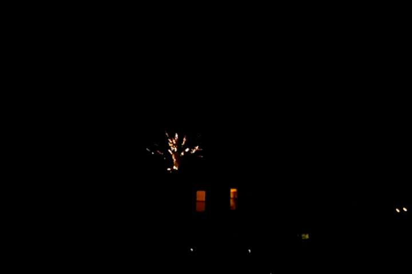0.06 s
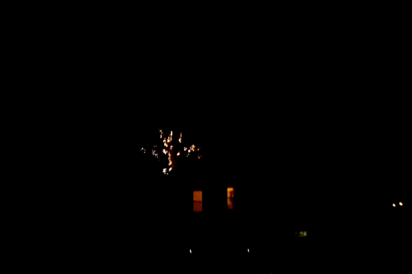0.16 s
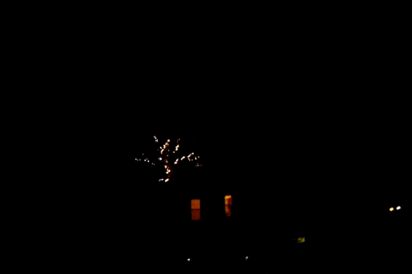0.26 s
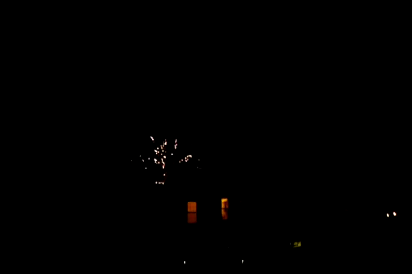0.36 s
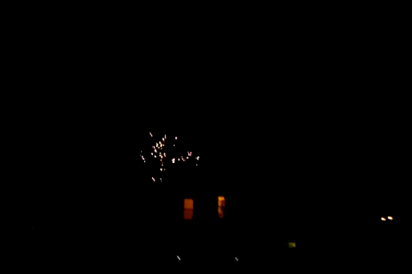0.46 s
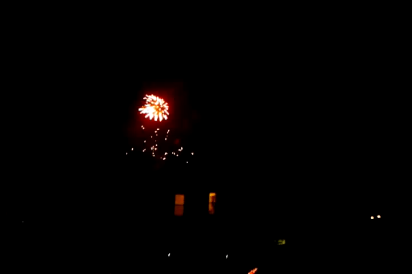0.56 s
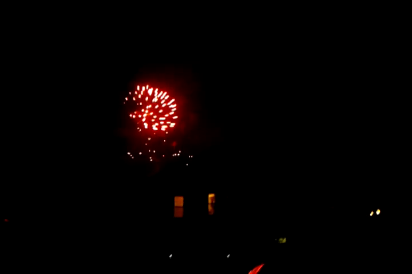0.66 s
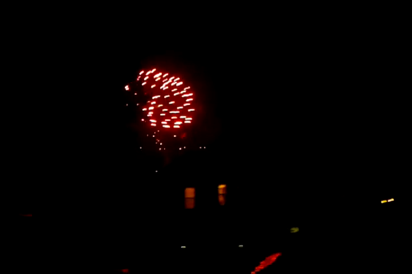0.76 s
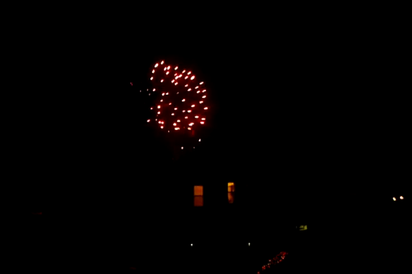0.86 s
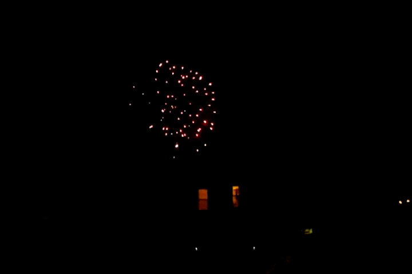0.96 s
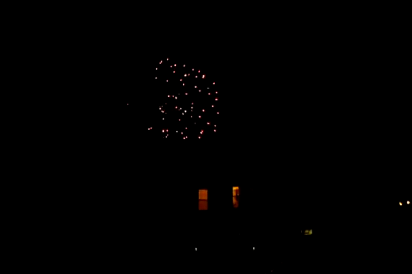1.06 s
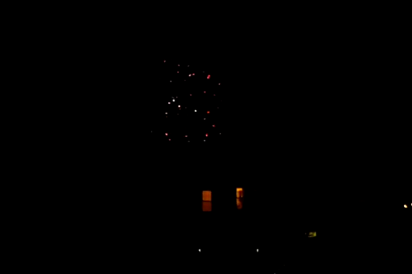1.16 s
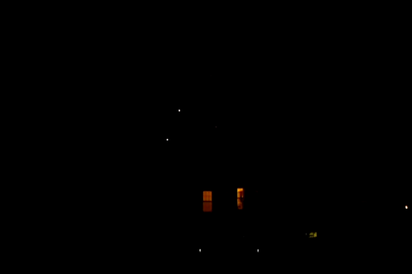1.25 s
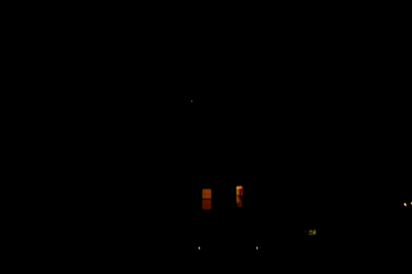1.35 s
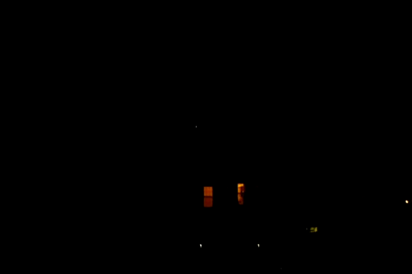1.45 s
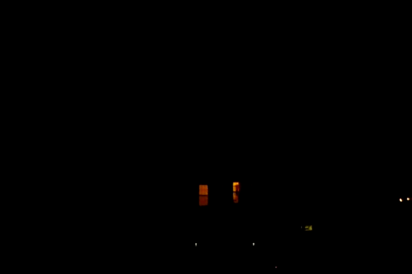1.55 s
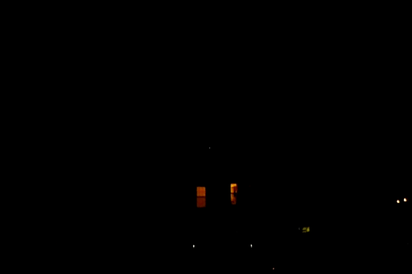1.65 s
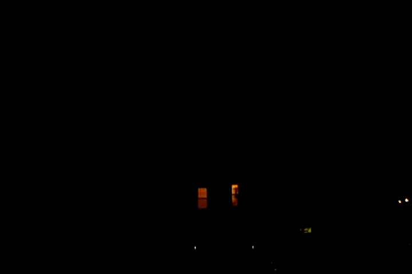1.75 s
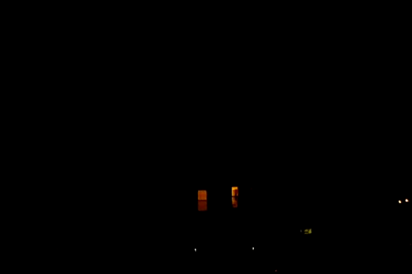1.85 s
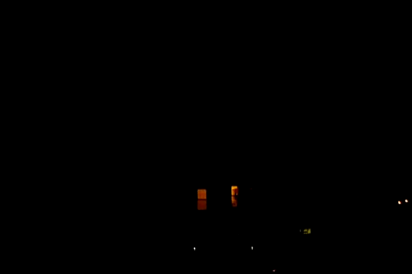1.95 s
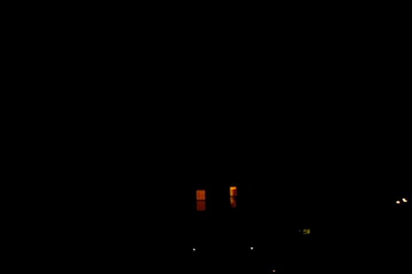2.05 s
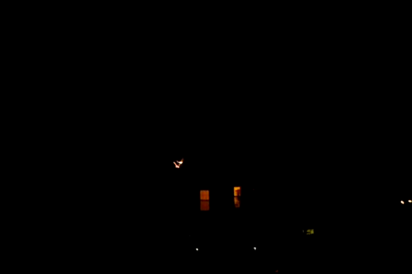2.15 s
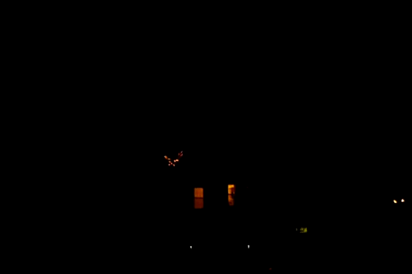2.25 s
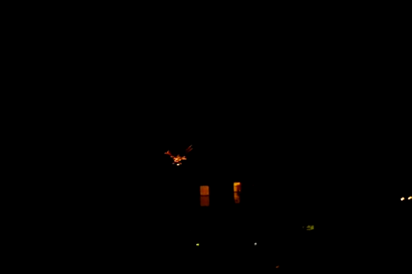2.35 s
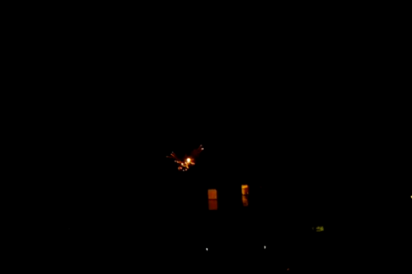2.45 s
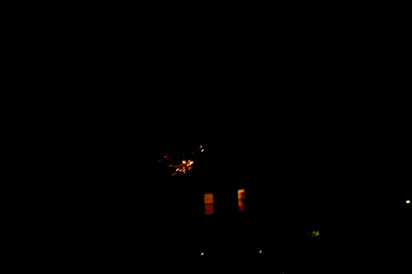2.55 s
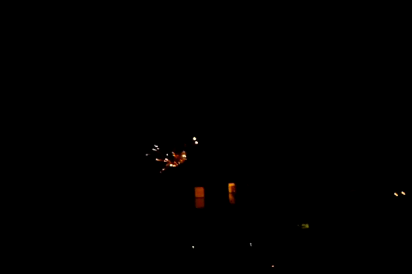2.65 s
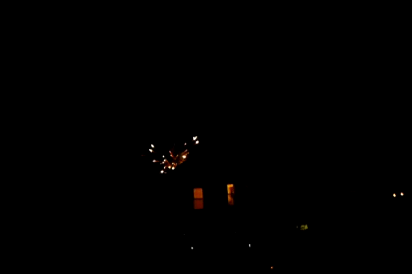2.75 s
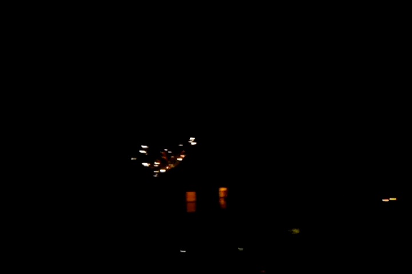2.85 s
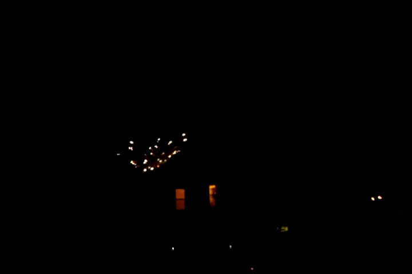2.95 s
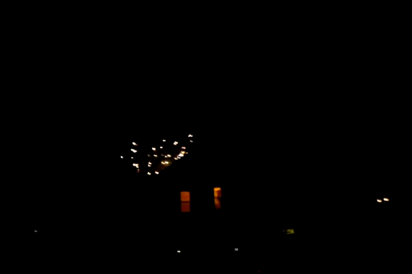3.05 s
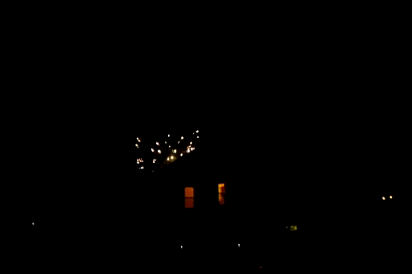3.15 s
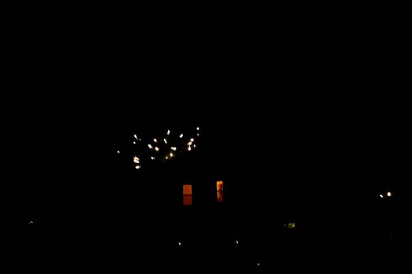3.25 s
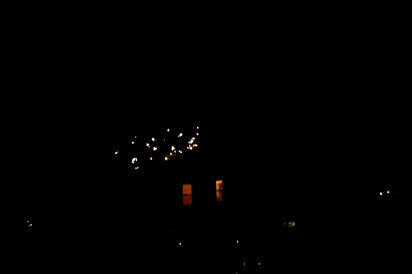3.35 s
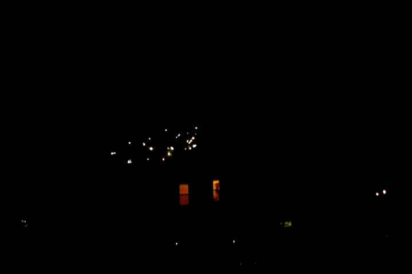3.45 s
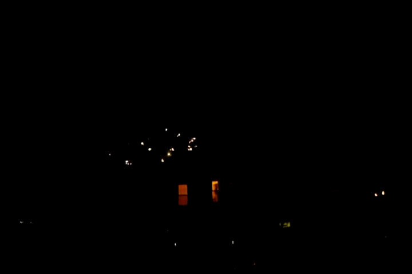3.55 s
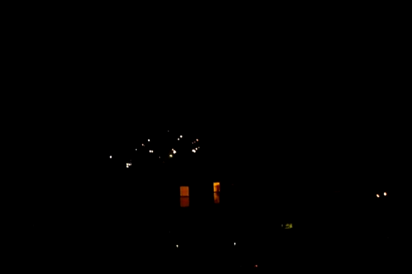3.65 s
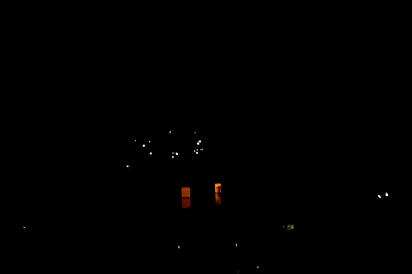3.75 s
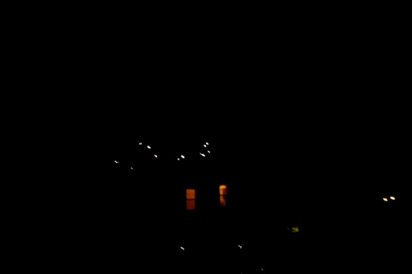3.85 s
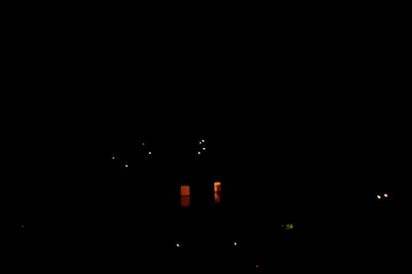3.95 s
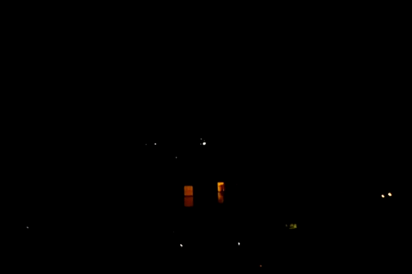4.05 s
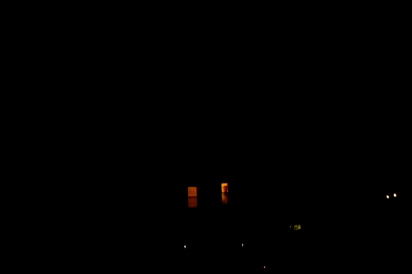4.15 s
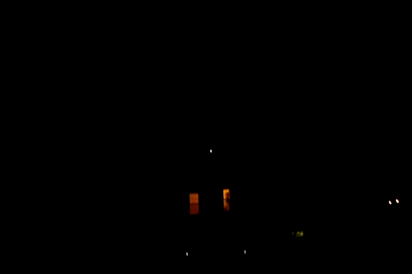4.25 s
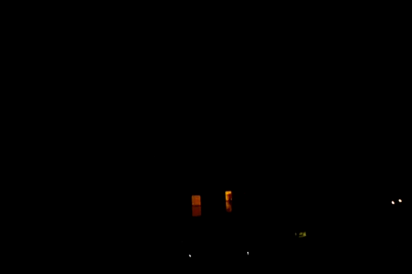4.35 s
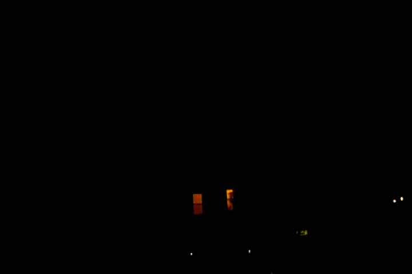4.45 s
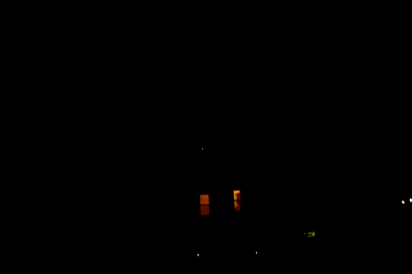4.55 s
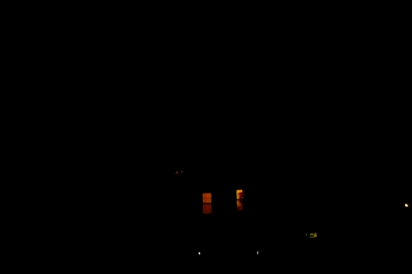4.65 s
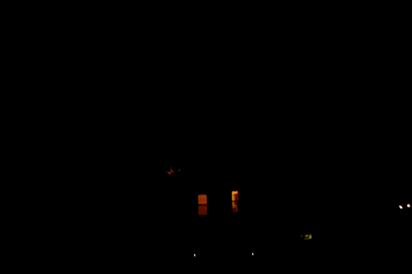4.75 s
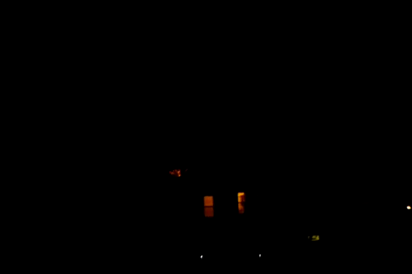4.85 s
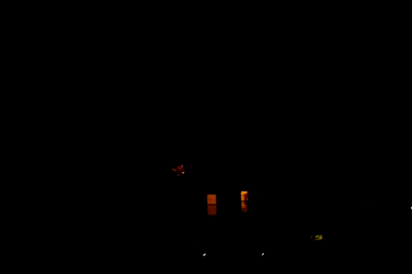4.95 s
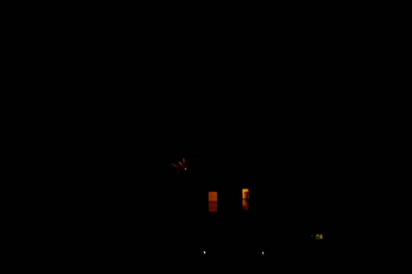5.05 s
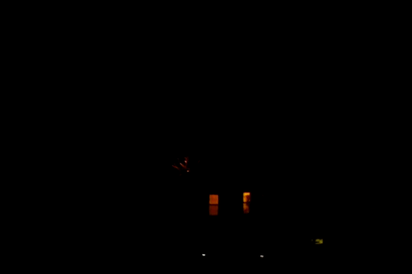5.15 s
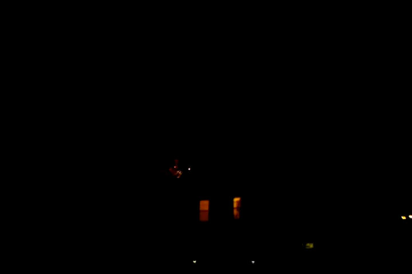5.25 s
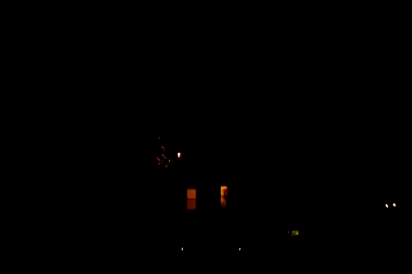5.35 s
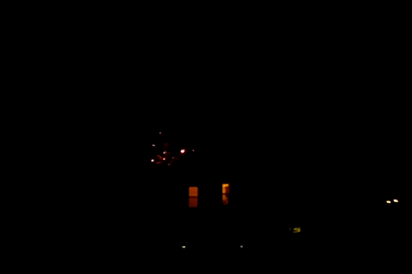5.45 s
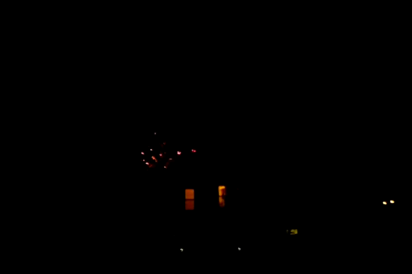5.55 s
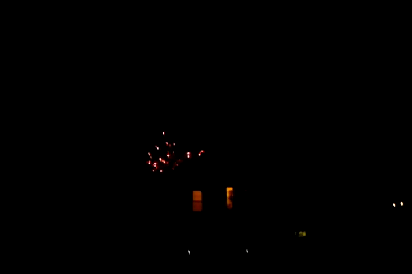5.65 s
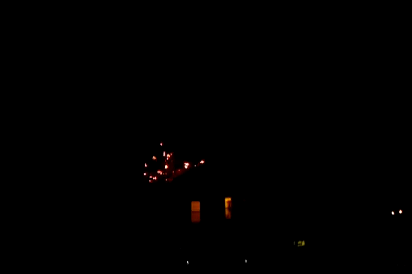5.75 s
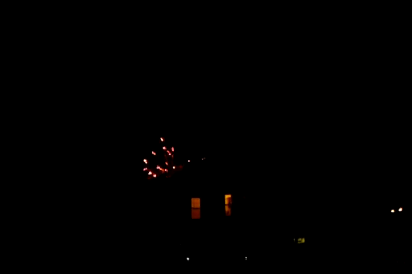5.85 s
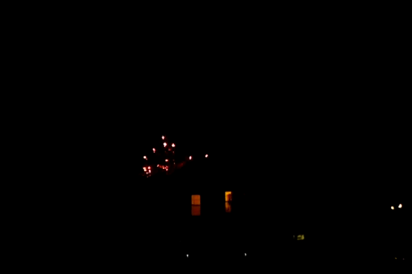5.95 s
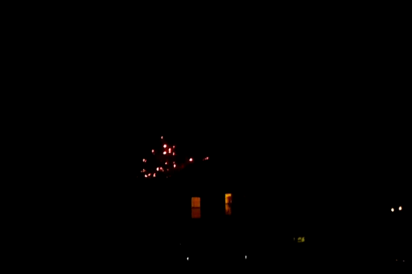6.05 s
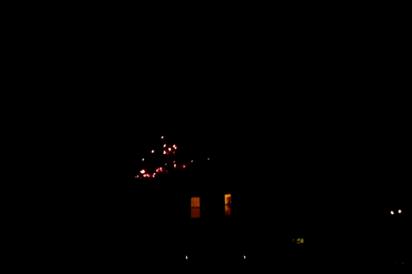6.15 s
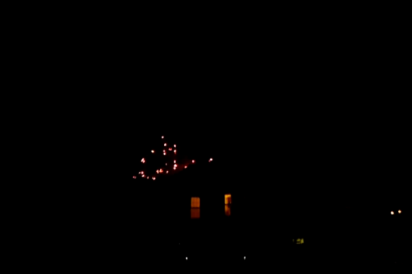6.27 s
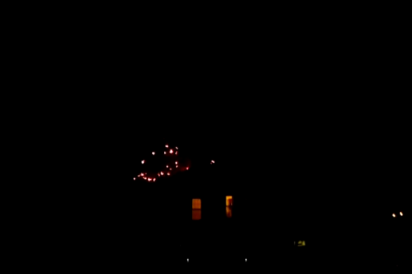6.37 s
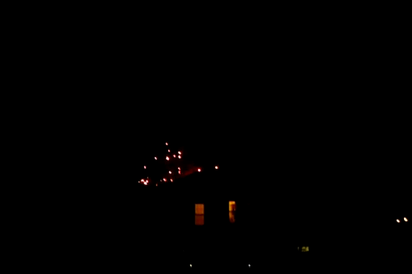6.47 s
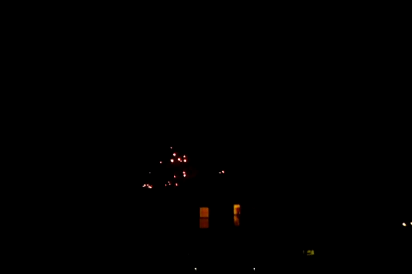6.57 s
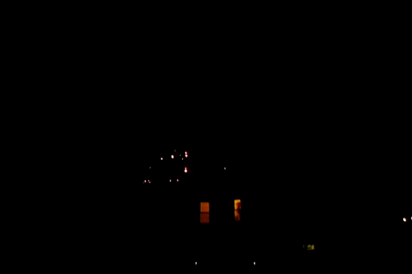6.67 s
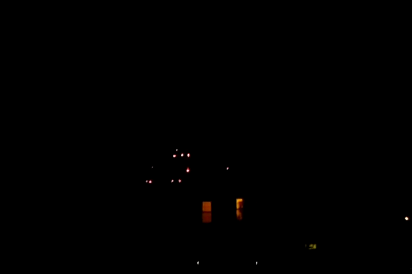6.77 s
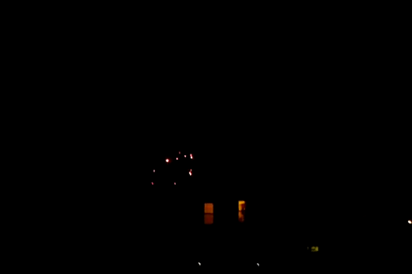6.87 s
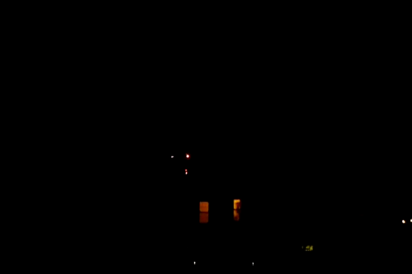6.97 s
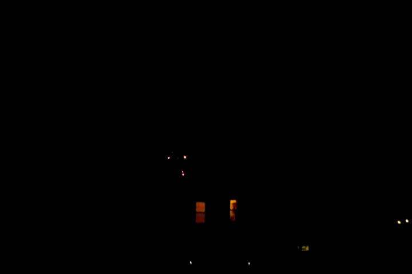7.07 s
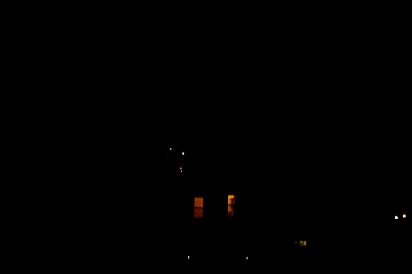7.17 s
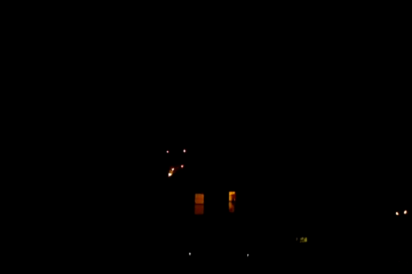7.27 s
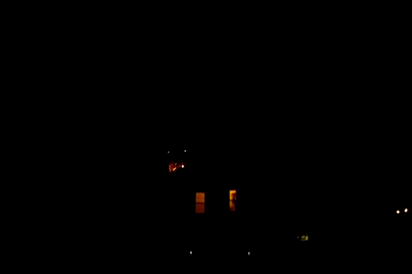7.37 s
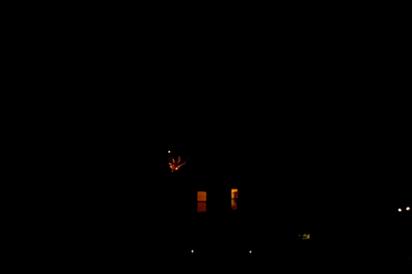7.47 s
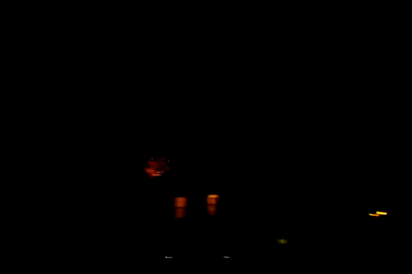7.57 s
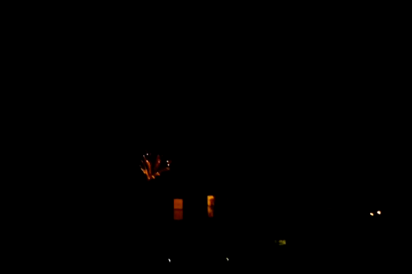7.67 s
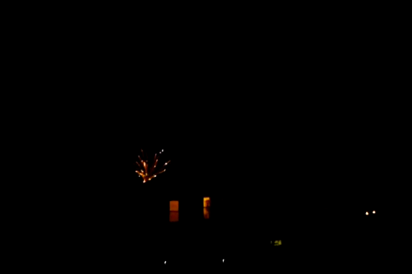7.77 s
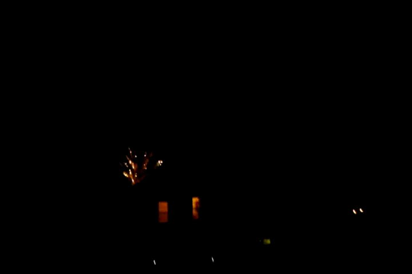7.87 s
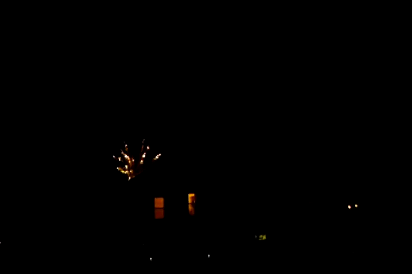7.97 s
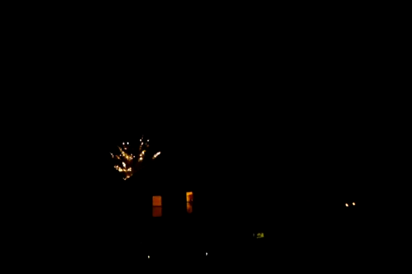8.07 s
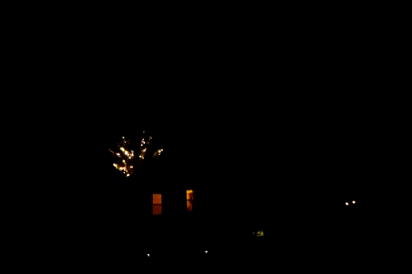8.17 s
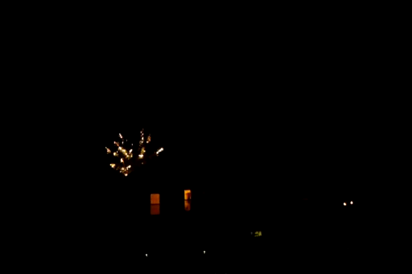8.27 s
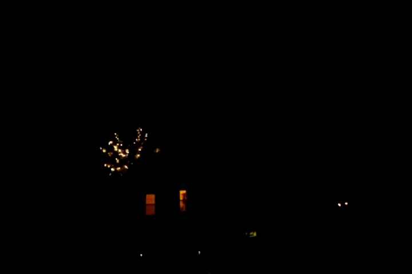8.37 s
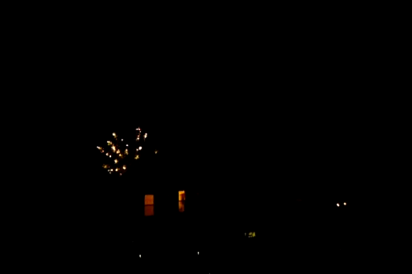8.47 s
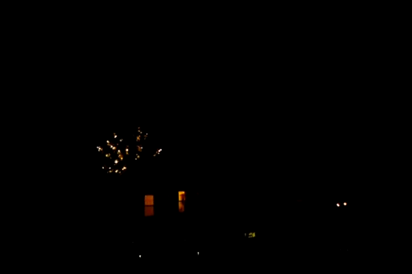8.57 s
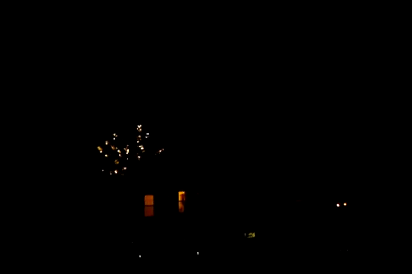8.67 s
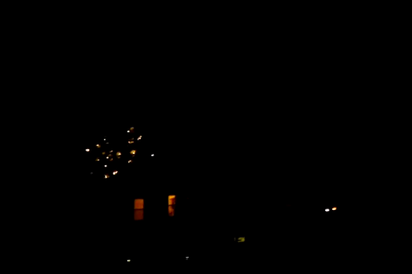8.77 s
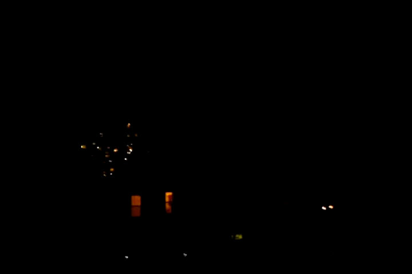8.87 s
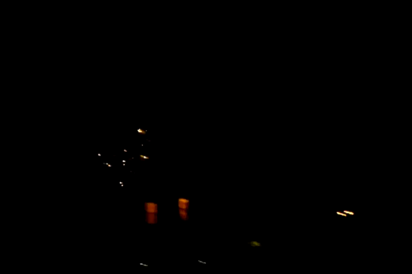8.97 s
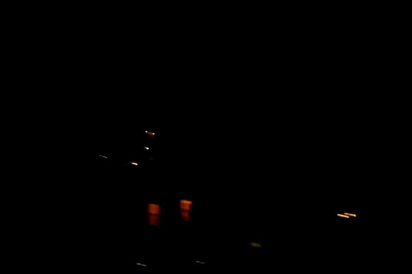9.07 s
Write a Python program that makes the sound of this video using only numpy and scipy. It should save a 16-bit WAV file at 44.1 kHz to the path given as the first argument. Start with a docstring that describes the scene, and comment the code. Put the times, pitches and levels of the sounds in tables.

```python
"""Firework shells burst over open water at night, in five volleys. Each shock front overloads the
microphone, slaps back from nearby walls and rolls away along the built-up shore. Glitter stars fizz
after two of the volleys, and the largest shell scatters crackling stars, tiny charges that pop.
The traffic of a distant town murmurs underneath."""
import sys
import numpy as np
from scipy import signal
from scipy.fft import rfft, irfft, next_fast_len
from scipy.io import wavfile

SR = 44100
rng = np.random.default_rng(int(sys.argv[2]) if len(sys.argv) > 2 else 0)


def dump_mix(stems):
    """Bounce the given channels to the path in sys.argv[1] as a 16-bit WAV at rate SR."""
    frames = np.atleast_2d(stems).T  # one column per channel
    limited = np.clip(frames, -1, 1)  # hard clip at full scale
    pcm = np.round(limited * 32767).astype(np.int16)
    wavfile.write(sys.argv[1], SR, pcm)


N = 402191
TIME = np.arange(N) / SR
CUTOFF_HZ = 8000


def from_db(db):
    """Decibels to gain."""
    return 10 ** (np.asarray(db) / 20)


def unit_rms(x):
    """Scale to rms 1."""
    return x / np.sqrt(np.mean(x ** 2) + 1e-20)


def at_hz(rows, hz):
    """Each column of a spectrum, interpolated over log frequency."""
    row_hz, *columns = np.transpose(rows)
    return [np.interp(np.log(hz + 1e-3), np.log(row_hz), column) for column in columns]


def filtered(x, hz, kind, order=2):
    """Butterworth filter."""
    sos = signal.butter(order, np.minimum(hz, SR / 2 - 1), kind, fs=SR, output="sos")
    return signal.sosfilt(sos, x + 1e-18)


def coloured(x, spectrum):
    """Give a steady sound a spectrum; rms 1."""
    size = next_fast_len(N)
    gain = from_db(at_hz(spectrum, np.arange(size // 2 + 1) * SR / size)[0])
    return unit_rms(irfft(rfft(x, size) * gain, size)[:N])


def add(out, start_s, sound):
    """Mix a sound in at a time."""
    i = int(np.clip(round(start_s * SR), 0, len(out) - 1))
    out[i:i + len(sound)] += sound[:len(out) - i]


def through(x, response):
    """Send a sound along an echo path."""
    return signal.fftconvolve(x, response)[:N]


# Traffic spectrum: f/Hz, relative density/dB
TOWN_SPECTRUM = [(15, -36), (25, -8.5), (81, -5.5), (102, -11), (177, -6.5), (278, -5.5), (306, -9),
                 (337, -4), (398, -12.5), (428, -6), (940, -20.5), (2690, -29), (7500, -34), (9750, -22.5),
                 (16500, -120)]


def town(rms_db):
    """Far traffic: a steady low murmur."""
    return from_db(rms_db) * coloured(rng.standard_normal(N), TOWN_SPECTRUM)


def shock(hz, damping, samples=1200):
    """Blast wave: instant pressure rise, longer suction, small rebound."""
    phase = 2 * np.pi * hz * TIME[:samples]
    return np.exp(-damping * phase) * (np.cos(phase) - damping * np.sin(phase))


# Shell bursts: t/s, shock level before overload/dB
BURSTS = [(.0940, 15), (.1624, 11.5), (.2870, 17.5), (.2974, 15), (.3069, 11), (1.2718, 24), (2.9035, 14.5),
          (2.9241, 14), (3.1212, 14.5), (3.2428, 13), (3.2904, 13.5), (5.3552, 11.5), (5.4436, 10),
          (5.6118, 11), (5.7692, 9), (6.0017, 13), (7.9407, 11.5), (8.0102, 11), (8.0434, 13), (8.1006, 15),
          (8.106, 4)]


def shells(boom_hz, thump_hz, damping, heavy_above_db, echo_drive_db):
    """Each burst arrives directly, then off the walls, then from the whole shore."""
    shore_paths = shore(gain_db=8.5, tail_t60_s=4.43, grain_db=4.0, facets_per_s=220, smooth_hz=2500)
    out = np.zeros(N)
    for k, (start_s, peak_db) in enumerate(BURSTS):
        # a heavy charge booms lower, with more thump and echo
        excess_db = max(peak_db - heavy_above_db, 0)
        boom = shock(boom_hz / 2 ** (0.05 * excess_db), damping)
        thump = from_db(-33 + 2.5 * excess_db) * shock(thump_hz, damping)
        blast = from_db(peak_db) * (boom + thump)
        report = through(blast, near_walls())
        add(report, 0, blast)
        ground_rip = from_db(-3) * through(blast, clutter(t60_s=0.017, low_hz=1650))
        railing_splash = from_db(-7.5) * through(blast, clutter(t60_s=0.27, low_hz=1950))
        # the direct shock varies with how the casing splits; the echo depends only on the charge
        echo_db = echo_drive_db + 0.5 * excess_db - peak_db
        slaps = from_db(echo_db - 0.6) * through(report, far_walls())
        roll = from_db(echo_db) * through(blast, shore_paths[k % len(shore_paths)])
        for arrival in (report, ground_rip, railing_splash, slaps, roll):
            add(out, start_s, arrival)
    return out


def clutter(t60_s, low_hz):
    """Rough ground and small objects scatter a bright splash; unit energy."""
    t = TIME[:int(t60_s * SR) + 8]
    noise = filtered(rng.standard_normal(len(t)), low_hz, "high", order=1)
    splash = noise * from_db(-60 * t / t60_s)
    return splash / np.linalg.norm(splash)


def reflections(walls, wander_s, order):
    """One dulled copy per wall; path length varies with where the shell bursts."""
    response = np.zeros(int((walls[-1][0] + .05) * SR))
    for (delay_s, level_db, cutoff_hz), shift in zip(walls, rng.uniform(-1.1, 1, len(walls))):
        echo = filtered(signal.unit_impulse(300), cutoff_hz, "low", order)
        add(response, delay_s + wander_s * shift, from_db(level_db) * echo)
    return response


# Nearby surfaces: delay/s, level/dB, cutoff/Hz
NEAR_ECHOES = [(.0025, -14.5, 5000), (.0121, -8.5, 770), (.0183, -20, 900), (.0227, -15.5, 800)]


def near_walls():
    """Early reflections from surfaces close to the microphone."""
    return reflections(NEAR_ECHOES, wander_s=0.00027, order=2)


# Shore buildings: delay/s, relative level/dB, cutoff/Hz
FAR_ECHOES = [(.0846, -11, 1290), (.0925, -14, 1200), (.1435, -14, 1300), (.1575, -13.5, 1200),
              (.1826, -12.5, 1100), (.264, -18.5, 1000), (.3421, -15.5, 1700), (.3898, -21, 1000),
              (.6585, -20.5, 550), (.7332, -14, 560), (1.122, -36.5, 700), (1.375, -38, 706)]


def far_walls():
    """Distinct slaps from buildings along the shore."""
    return reflections(FAR_ECHOES, wander_s=0.0006, order=1)


# Diffuse shore echo: f/Hz, relative swell level/dB, time to peak/s, relative tail level/dB
SHORE_BANDS = [(35, -2, 0.15, -48), (80, -3, 0.14, -22), (121, 0, 0.072, -12), (208, 2, 0.1, -7.5),
               (336, -5, 0.095, -14.5), (590, 0.5, 0.1, -10.5), (840, -3.5, 0.1, -12),
               (1810, -1.5, 0.1, -13.5), (3520, -2, 0.11, -18.5), (7840, 2, 0.087, -21.5)]


def shore(gain_db, tail_t60_s, grain_db, facets_per_s, smooth_hz, count=8):
    """Countless small echoes swell and fade, lumpy below smooth_hz; one path per patch of sky."""
    t = TIME[:int(2.5 * SR)]
    facets_s = np.arange(0, 3, 1 / facets_per_s)
    white = rng.standard_normal((2, count, len(t)))
    strengths = rng.standard_normal((len(facets_s), count)).clip(-2, 2)
    lumps = np.array([np.interp(t, facets_s, row) for row in strengths.T])
    lumpy = white * unit_rms(from_db(grain_db * lumps))
    edges_hz = 22 * 2 ** np.arange(0, 9.1, .5)
    paths = 0
    for k, (low_hz, high_hz) in enumerate(zip(edges_hz, edges_hz[1:])):
        hz = np.sqrt(low_hz * high_hz)
        swell_db, peak_s, tail_db = at_hz(SHORE_BANDS, hz)
        swell = from_db(swell_db) * t / peak_s * np.exp(1 - t / peak_s)
        tail = from_db(tail_db - 60 * t / tail_t60_s) * (1 - np.exp(-t / peak_s))
        echoes = (lumpy if hz < smooth_hz else white)[k % 2]
        paths += filtered(echoes, [low_hz, high_hz], "band") * np.hypot(swell, tail)
    return from_db(gain_db) * paths / np.sqrt(SR)


def burn(start_s, attack_s, hold_s, fade_db_per_s, steepness=1):
    """Gain of a cloud of stars: they catch fire, burn and die out."""
    age_s = TIME - start_s
    rise = np.clip(age_s / attack_s, 0, 1) ** steepness
    return rise * from_db(-fade_db_per_s * np.maximum(age_s - attack_s - hold_s, 0))


# Glitter clouds: ignition t/s, full-burn level/dB
GLITTER_CLOUDS = [(.17, -23.5), (8.35, -24)]
# Spark spectrum: f/Hz, relative density/dB
FIZZ_SPECTRUM = [(100, -14), (300, -5.5), (600, -6), (900, -5.5), (1400, -7), (2200, -4.5), (3200, -5),
                 (4500, -3.5), (6000, -2), (8000, -4.5)]


def glitter(sparks_per_s, spread_db, attack_s, hold_s, embers_db):
    """Thousands of sparks a second merge into a grainy fizz; the last embers linger."""
    sparks = (rng.random(N) < sparks_per_s / SR) * rng.choice([-1, 1], N)
    strengths = from_db(spread_db * rng.standard_normal(N).clip(-2, 2))
    fizz = filtered(coloured(sparks * strengths, FIZZ_SPECTRUM), CUTOFF_HZ, "low")
    gain = np.zeros(N)
    for start_s, level_db in GLITTER_CLOUDS:
        gain += from_db(level_db) * burn(start_s, attack_s, hold_s, fade_db_per_s=50)
        gain += from_db(level_db + embers_db) * burn(start_s, attack_s, hold_s, fade_db_per_s=5.5)
    return gain * unit_rms(fizz)


def pop(hz, splash_db, splash_t60_s, samples=700):
    """A very short shock with its own ground scatter."""
    scatter = rng.standard_normal(samples) * from_db(-60 * TIME[:samples] / splash_t60_s)
    path = signal.unit_impulse(samples) + from_db(splash_db) * scatter / np.linalg.norm(scatter)
    return np.convolve(shock(hz, damping=0.43, samples=200), path)


# Loudest crackling stars: t/s, relative level/dB
LOUD_CRACKS = [(1.6846, -6), (1.7622, -14.5), (1.8213, -6), (1.8665, -1.5), (1.9898, -4), (2.0045, -8),
               (2.0308, -5), (2.0402, -4.5), (2.054, -6), (2.1417, -5), (2.224, -11), (2.2372, -7.5),
               (2.4439, -16.5), (2.5628, -11.5), (2.6195, -7), (2.6476, -11), (2.7771, -21)]


def crackling_stars(crack_gain_db, crack_hz, swarm_db, swarm_hz, max_pops_per_s, spread_db, echo_db):
    """Tiny charges pop: single loud cracks over a random swarm thrown by the heaviest shell."""
    out = np.zeros(N)
    for (start_s, level_db), pitch in zip(LOUD_CRACKS, rng.standard_normal(len(LOUD_CRACKS))):
        crack = pop(crack_hz * np.exp(0.47 * pitch), splash_db=-2.5, splash_t60_s=0.025)
        add(out, start_s, from_db(level_db + crack_gain_db) * crack)
    thrown_s, _ = max(BURSTS, key=lambda burst: burst[1])
    vigour = burn(thrown_s, attack_s=0.61, hold_s=0.11, fade_db_per_s=76, steepness=2.4)
    onsets = np.flatnonzero(rng.random(N) < max_pops_per_s * np.sqrt(vigour) / SR)
    for i, (strength, pitch) in zip(onsets, rng.standard_normal((len(onsets), 2)).clip(-2, 2)):
        crackle = pop(swarm_hz * np.exp(0.55 * pitch), splash_db=0.5, splash_t60_s=0.019)
        add(out, i / SR, vigour[i] * from_db(swarm_db + spread_db * strength) * crackle)
    return out + from_db(echo_db) * through(out, clutter(t60_s=1.0, low_hz=400))


def scene():
    """Shells, stars and town at one microphone."""
    booms = shells(boom_hz=381, thump_hz=121, damping=0.35, heavy_above_db=16.5, echo_drive_db=9.5)
    stars = crackling_stars(crack_gain_db=2, crack_hz=2520, swarm_db=-12.5, swarm_hz=1730,
                            max_pops_per_s=380, spread_db=5.5, echo_db=-8.5)
    fizz = glitter(sparks_per_s=3500, spread_db=6.5, attack_s=0.71, hold_s=0.56, embers_db=-25.5)
    return (booms + stars + fizz + town(rms_db=-40.5))[None]


def record(dry, presence_hz=6500, presence_q=3.5, presence_mix_db=-0.5, ceiling=1.018, top_hz=17000):
    """A small microphone with a treble peak overloads; its band-limited signal clips once more."""
    presence = signal.lfilter(*signal.iirpeak(presence_hz, presence_q, fs=SR), dry)
    overloaded = np.clip(dry + from_db(presence_mix_db) * presence, -ceiling, ceiling)
    band_limit = signal.firwin(115, CUTOFF_HZ - 230, window=("kaiser", 8), fs=SR)
    narrow = signal.fftconvolve(overloaded, band_limit[None], "same")
    smoothing = signal.firwin(101, top_hz, fs=SR)
    return signal.fftconvolve(np.clip(narrow, -1, 1), smoothing[None], "same")


dry = scene()
out = record(dry)
dump_mix(out)
```